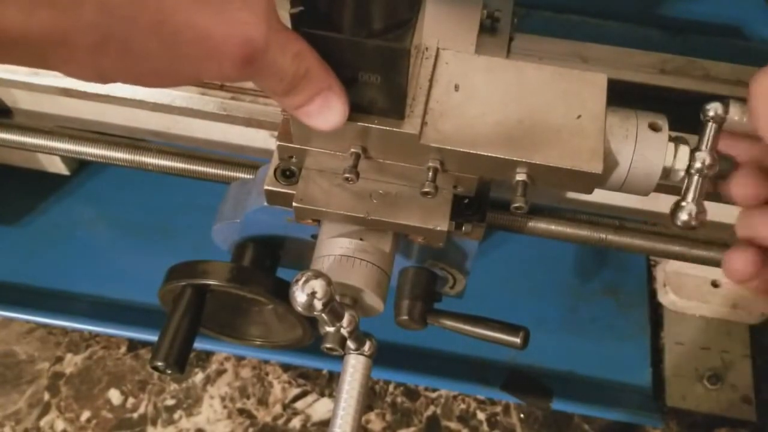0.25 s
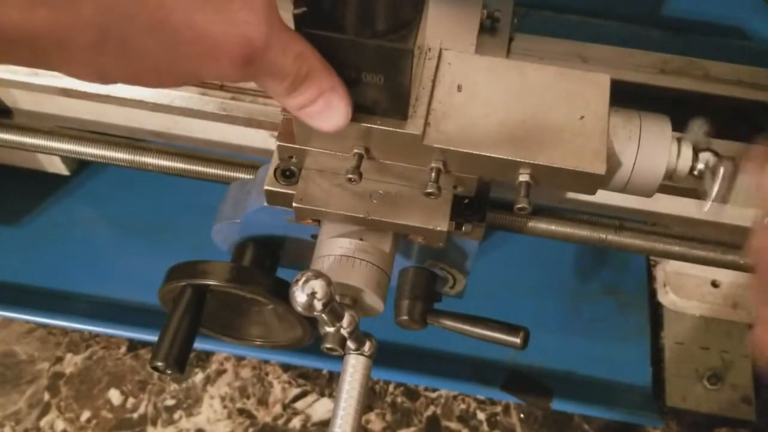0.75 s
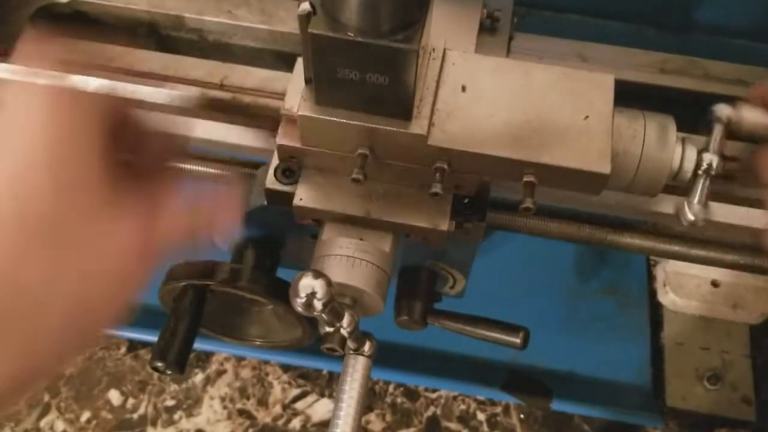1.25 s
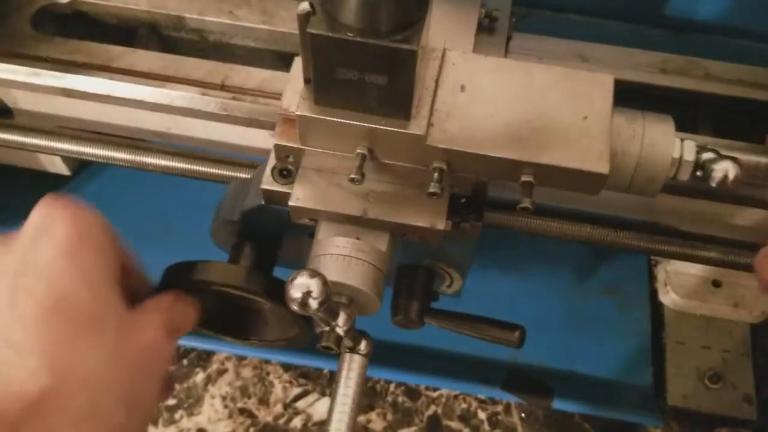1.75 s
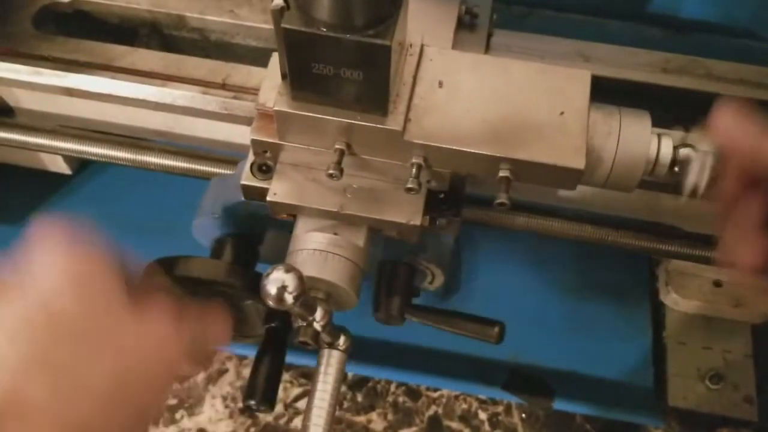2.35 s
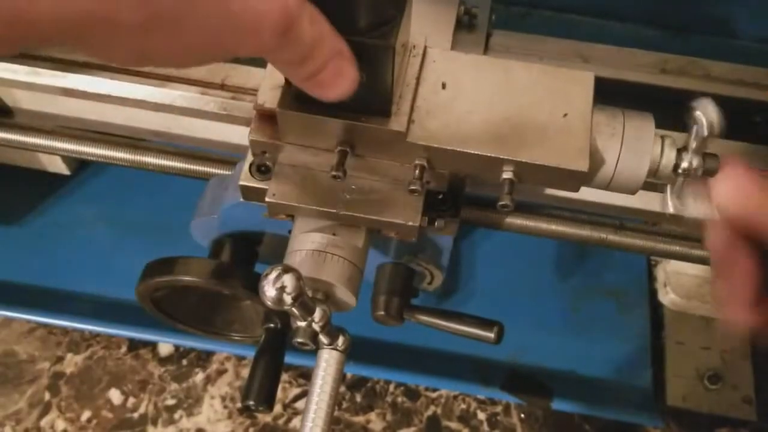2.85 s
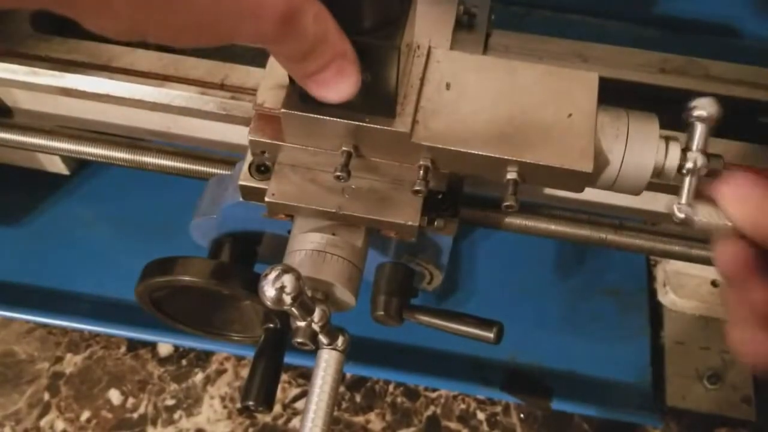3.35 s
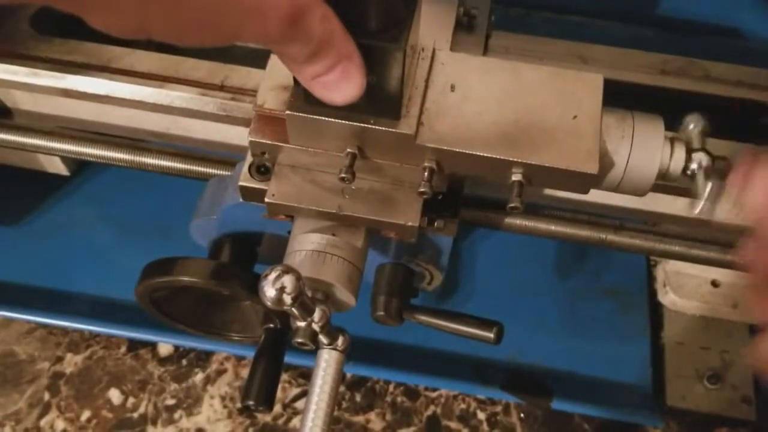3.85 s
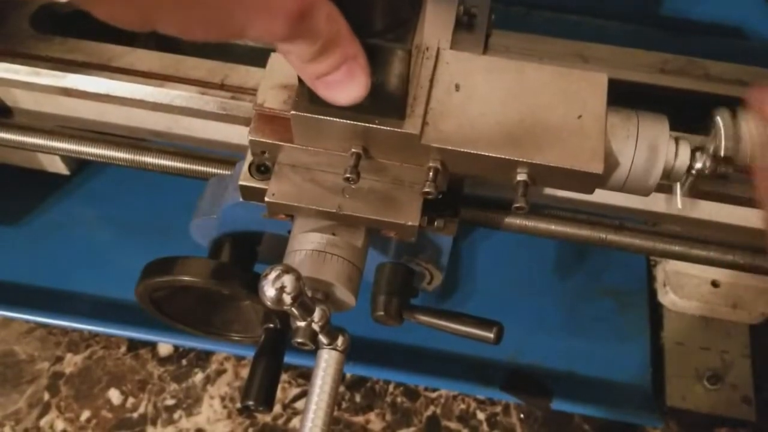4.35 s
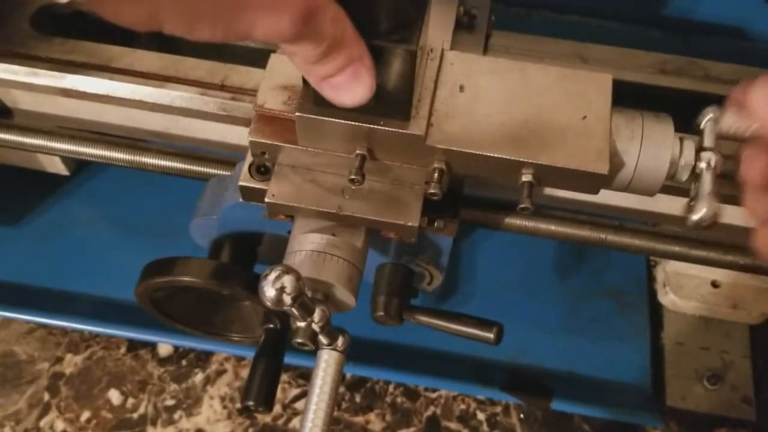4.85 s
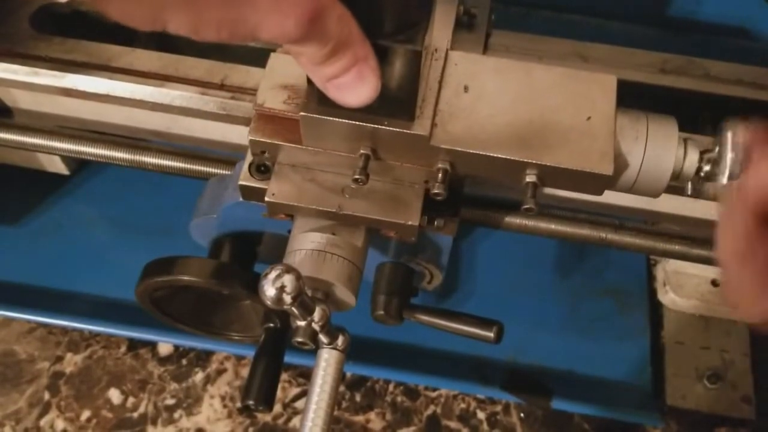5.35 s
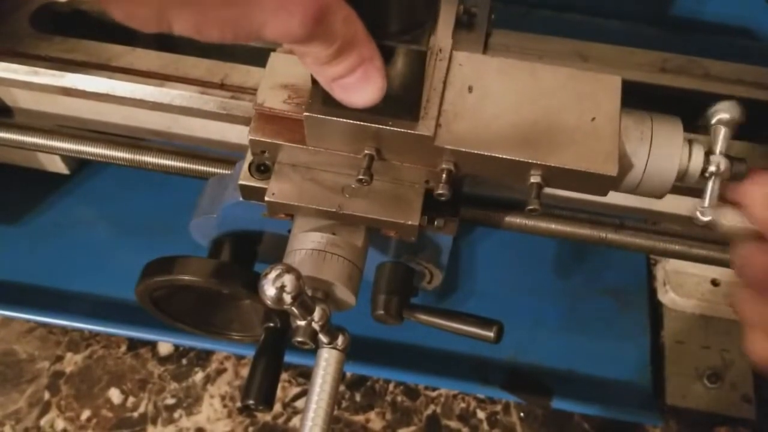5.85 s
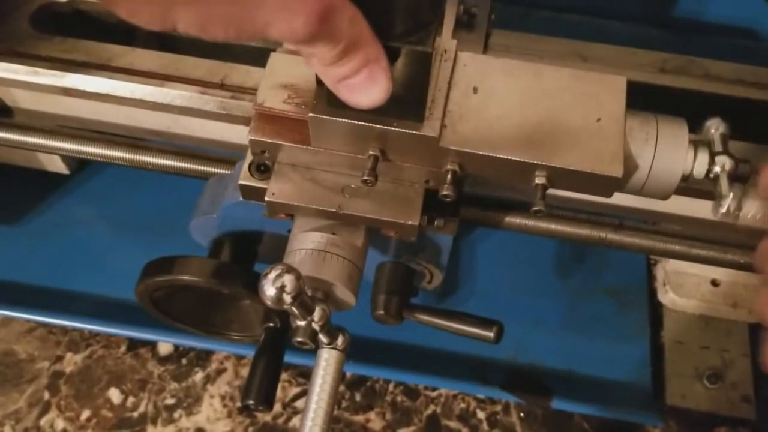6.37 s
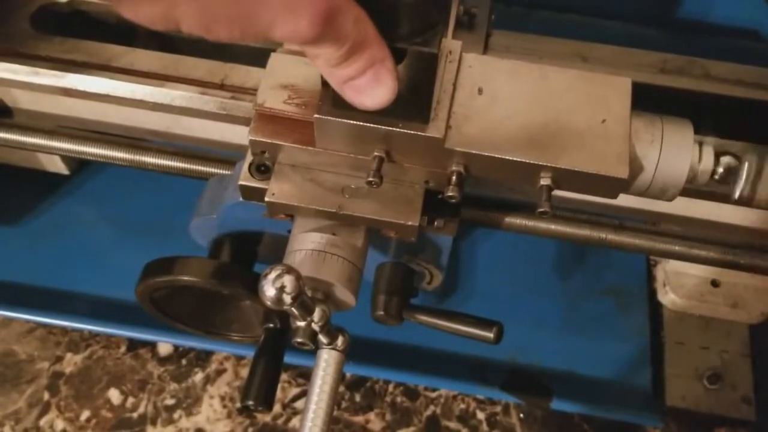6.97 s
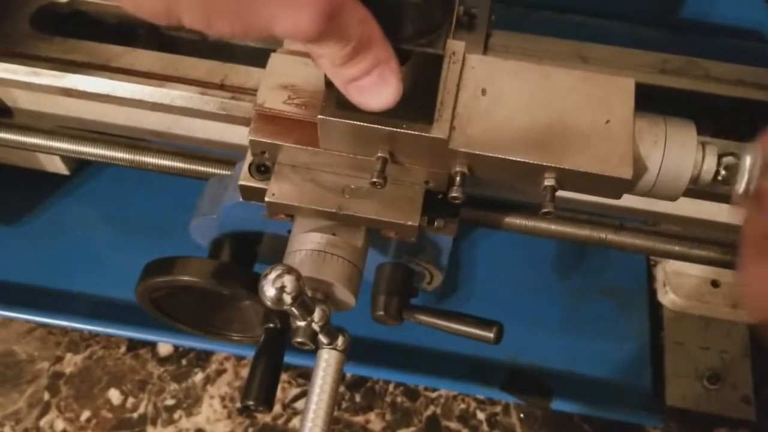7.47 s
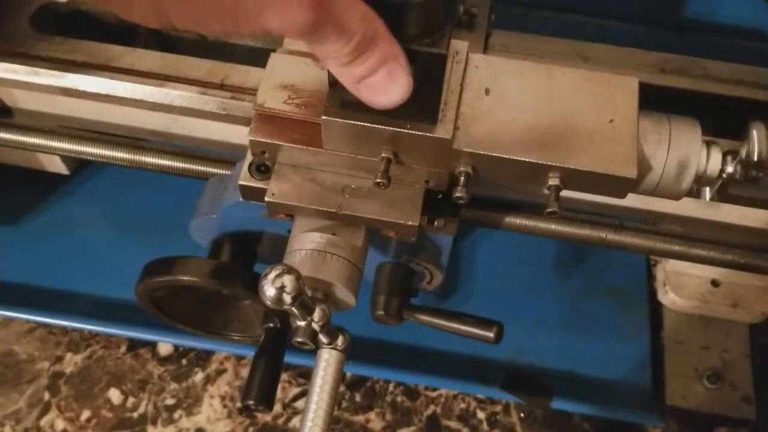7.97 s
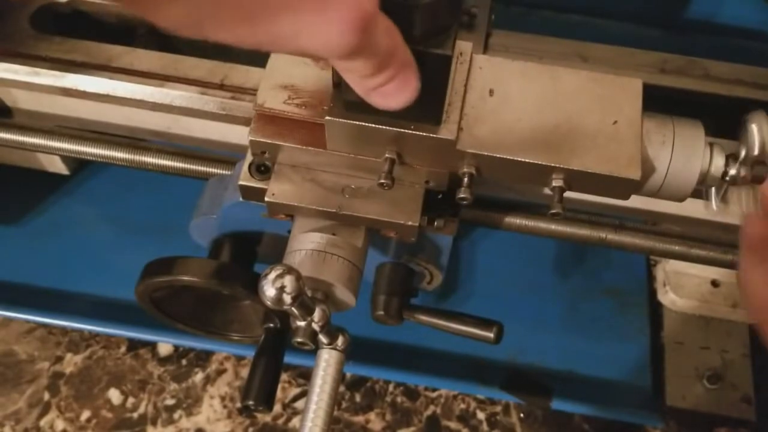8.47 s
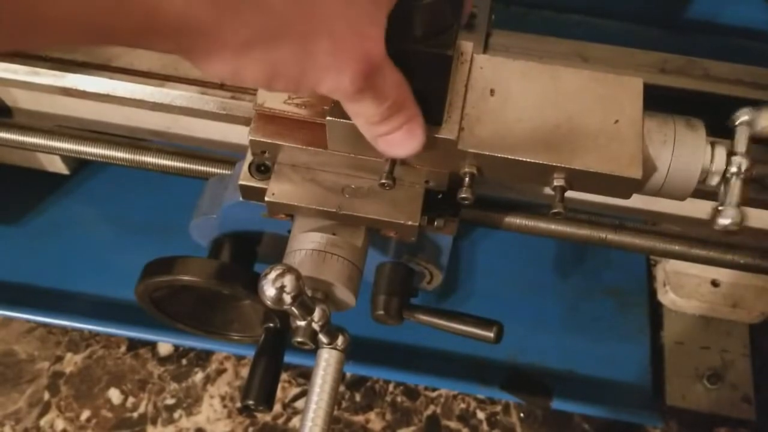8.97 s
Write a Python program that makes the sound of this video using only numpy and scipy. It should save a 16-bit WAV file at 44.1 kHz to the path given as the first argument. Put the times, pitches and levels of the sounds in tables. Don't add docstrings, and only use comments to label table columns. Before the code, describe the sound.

A small metal lathe slide is hand-cranked in steady turns, thumping softly on its bench with light ticks, rubbing scrapes and a brief gear rattle early on.

```python
import sys
import numpy as np
from scipy import signal
from scipy.fft import rfft, irfft, next_fast_len
from scipy.io import wavfile
from scipy.ndimage import map_coordinates

SR = 44100
rng = np.random.default_rng(int(sys.argv[2]) if len(sys.argv) > 2 else 0)


def unload_wav(signal):
    wavfile.write(
        sys.argv[1],
        SR,
        np.round(np.clip(np.atleast_2d(signal).T, -1, 1) * 32767).astype(np.int16),
    )


def voltage_ratio(decibels):
    exponent = np.asarray(decibels, float) / 20
    return 10 ** exponent


N = 406161


def unit(x):
    return x / np.sqrt(np.mean(x ** 2) + 1e-20)


def along(points, hz):
    f, v = np.transpose(points)
    return np.interp(np.log(hz + 1), np.log(f + 1), v)


def curves(rows):
    s, *cols = np.transpose(rows)
    return [np.interp(np.arange(N) / SR, s, c) for c in cols]


def within(rows):
    t = np.arange(N) / SR
    return np.clip(np.minimum(t - rows[0][0], rows[-1][0] - t) / 0.0026, 0, 1)


def wobble(rate):
    knots = rng.standard_normal(int(N * rate / SR) + 4)
    return map_coordinates(knots, [np.arange(0, N + 8, 8) * rate / SR]).repeat(8)[:N]


def filtered(x, response):
    m = next_fast_len(x.shape[-1] + min(8192, x.shape[-1] // 4))
    return irfft(rfft(x, m) * response(np.fft.rfftfreq(m, 1 / SR)), m)[..., :x.shape[-1]]


def resonances(peaks):
    def response(f):
        return sum((-1) ** k * voltage_ratio(db) * 1j * f * w / (c * c - f * f + 1j * f * w)
                   for k, (c, w, db) in enumerate(peaks))
    return response


def low_cut(hz, corner_hz):
    return hz ** 2 / (hz ** 2 + corner_hz ** 2)


def pair(response, alike):
    def mid_and_side(hz):
        turn = np.arccos(np.clip(along(alike, hz), -1, 1)) / 2
        return response(hz) * np.array([np.cos(turn), np.sin(turn)])
    mid, side = filtered(rng.standard_normal((2, N)), mid_and_side)
    return unit(np.array([mid + side, mid - side]))


def ring(modes, t, attack, loose=1):
    scatter_db, detune = 2 * loose, 0.008 * loose
    tones = 0
    for hz, db, t60 in modes:
        a, b = rng.standard_normal(2)
        decay = voltage_ratio(db + scatter_db * a - 60 * t / t60)
        tones = tones + decay * np.sin(2 * np.pi * hz * (1 + detune * b) * t)
    return tones * (1 - np.exp(-t / attack))


def contacts(events, modes, ring_db, crack_t60, tail_db, rise_s, note_t60, top_db):
    out, t = np.zeros((2, N + SR)), np.arange(SR // 10) / SR
    lead = 100
    burst = voltage_ratio(-60 * t / crack_t60) * (1 - np.exp(-t / rise_s))
    tail = voltage_ratio(tail_db - 60 * t / 0.069) * (1 - np.exp(-t / 0.0023))
    for s, db, dull_db, bright_db, note_hz in events:
        crack = rng.standard_normal((2, len(t))) * 1.005 + rng.standard_normal(len(t))
        chatter = voltage_ratio(4.56 * np.repeat(rng.standard_normal(len(t) // 45), 45))
        voices = modes + [(note_hz, 9.0 + 0.5 * dull_db, note_t60)]
        ringing = np.array([ring(voices, t, 0.00074 + rise_s) for _ in range(2)])
        blow = chatter * (crack * (burst + tail) + voltage_ratio(ring_db) * ringing)
        colour = [(300, dull_db + 7.5), (900, dull_db + 11.0), (2800, dull_db + 14.5),
                  (4000, -3.5), (7000, -10.5), (9000, bright_db), (11500, bright_db + 6.5),
                  (14000, bright_db + top_db), (15800, bright_db - 21)]
        blow = filtered(np.pad(blow, ((0, 0), (lead, 0))), lambda hz: voltage_ratio(along(colour, hz)))
        peak = np.abs(blow.mean(axis=0)).max()
        out[:, round(s * SR) - lead:][:, :len(t) + lead] += voltage_ratio(db + 0.5) * blow / peak
    return out[:, :N]


# frequency [Hz], level [dB per Hz].
AIR = [(15, -61), (25, -8), (64, -7.5), (123, -4), (223, -25.5), (463, -24), (607, -31.5), (1290, -32.5)]
# frequency [Hz], level [dB per Hz].
HISS = [(1560, -34), (2110, -34), (3080, -39.5), (8590, -41.5), (10700, -37), (13600, -40.5), (16000, -41)]
# frequency [Hz], likeness [0 to 1].
AIR_LIKENESS = [(30, 0.5), (120, 1), (300, 0.85), (600, 0.03), (12000, 0.08)]
# frequency [Hz], width [Hz], level [dB].
WHINE = (13280, 100, -87)


def air():
    hz, width, db = WHINE
    whine = voltage_ratio(db) * pair(resonances([(hz, width, 0)]), [(1000, 0.099)])
    hush = pair(lambda f: voltage_ratio(along(AIR + HISS, f)), AIR_LIKENESS)
    return voltage_ratio(-64.5 + 0.07 * wobble(2.7)) * hush + whine


# start [s], push [dB], pull [dB], rattle [dB], drag on the slide [dB].
TURNS = [(2.756, -46, -49.5, -17, 13.5), (3.019, -42.5, -44, -9.5, 6), (3.276, -40, -50.5, -13, 4),
         (3.542, -41, -40, 3.5, 9.5), (3.81, -43, -36, 0.5, 5), (4.076, -39.5, -39, 5.5, -1),
         (4.361, -41.5, -42.5, 3, 7), (4.65, -43.5, -35.5, 3.5, 2), (4.925, -46.5, -42, 3.5, -4),
         (5.207, -42.5, -57, -3, 2), (5.488, -38.5, -51.5, -5.5, -2), (5.769, -42, -46, 3.5, 5),
         (6.034, -40.5, -67, 0, 8.5), (6.323, -37.5, -47.5, -2.5, -2.5), (6.607, -39, -85, -11, 9.5),
         (6.849, -43.5, -60, 0, 13)]
# start [s], peak [dB], boards [dB], tray [dB].
GRIP_JOLTS = [(0.235, -45.5, -6, -30), (0.366, -58, -7, -34), (0.608, -53, -21, -42),
              (0.746, -56, -10, -36), (0.869, -61.5, 2, -25), (1.007, -55.5, -36, -49),
              (1.296, -43, -12.5, -33), (1.516, -50.5, -26, -41), (1.606, -40.5, -4, -32),
              (1.782, -53.5, -2, -12), (1.838, -62.5, 8.5, -6), (1.983, -52.5, -6, -19),
              (2.068, -54, 0.5, -16), (2.37, -37.5, -9, -36), (2.425, -44, -9, -34)]
# start [s], peak [dB], rattle [dB].
LATE_JOLTS = [(4.964, -39, -31), (6.147, -46, -3), (6.928, -35, -4.5), (7.188, -39.5, -8.5),
              (7.281, -47.5, 10), (7.658, -39, -16.5), (7.887, -51, -32), (7.966, -49, -3.5),
              (8.109, -53.5, -38), (8.246, -40.5, -47), (8.31, -44.5, -11), (8.522, -44.5, -31),
              (8.57, -45, -23), (8.764, -44.5, -6), (8.952, -56, 6), (9.069, -46.5, -1), (9.157, -47, -17)]


def lurches():
    pull_at, pull_rattle_db = 0.505, -7.5
    pushes = [(s, db, rattle_db) for s, db, _, rattle_db, _ in TURNS]
    pulls = []
    for (s, _, pull_db, rattle_db, _), following in zip(TURNS, TURNS[1:]):
        pulls.append((s + pull_at * (following[0] - s), pull_db, rattle_db + pull_rattle_db))
    return GRIP_JOLTS + [(s, db, -9 + 0.45 * rattle_db, -24.5 + rattle_db)
                         for s, db, rattle_db in pushes + pulls + LATE_JOLTS]


# frequency [Hz], level [dB], t60 [s].
BODY_MODES = [(121, 1, 0.21), (163.3, -4, 0.14), (94.3, -24, 0.24), (64.3, -19, 0.12)]
# frequency [Hz], level [dB], t60 [s].
BOARD_MODES = [(218, -2, 0.24), (290, -3, 0.18), (354, -2.5, 0.16)]
# frequency [Hz], level [dB], t60 [s].
TRAY_MODES = [(453.8, 1.5, 0.11), (438, -10.5, 0.13)]
# frequency [Hz], level [dB per Hz].
SCUFF = [(120, -10.5), (250, 5.5), (480, -3), (600, -14.5), (1200, -20.5), (2300, -41.5), (4000, -42)]
# time [s], effort [dB], load on the screw [dB], pinch of the gib [dB].
WORK = [(0.0, -64, -100, -97), (.3, -64, -85, -101), (.7, -55, -76, -78.5), (1.36, -75, -71.5, -79.5),
        (1.77, -47.5, -83, -76), (2.1, -60, -80, -79.5), (2.95, -60, -73.5, -76.5), (3.6, -56.5, -72, -81),
        (4.5, -56.5, -73, -79), (5.2, -54, -76, -76), (5.5, -54.5, -72, -78), (6.8, -55.5, -74, -73.5),
        (7.6, -67, -95.5, -88.5), (8.45, -50.5, -74.5, -78), (9.21, -59.5, -87, -81)]


def bench():
    out, t = np.zeros((2, N + SR)), np.arange(SR // 4) / SR
    held = voltage_ratio(24.6 * (1 - np.exp(-t / 0.069)))
    settle = 1 / (1 + (t / 0.11) ** 4)
    scuffs = pair(lambda hz: voltage_ratio(along(SCUFF, hz)), [(280, 0.63), (520, 0.48)])
    scuff_shape = voltage_ratio(-60 * t / 0.4) * (1 - np.exp(-t / 0.0015))
    scuff_level = np.zeros(N + SR)
    for s, db, boards_db, tray_db in lurches():
        body = voltage_ratio(-2.0) * ring(BODY_MODES, t, 0.0057)
        boards = voltage_ratio(boards_db - 10.0) * ring(BOARD_MODES, t, 0.031, loose=1.95)
        tray = np.array([ring(TRAY_MODES, t, 0.0088), ring(TRAY_MODES, t + 0.000087, 0.025)])
        tray *= voltage_ratio(tray_db + 14.0)
        start = round((s - 0.008) * SR)
        out[:, start:][:, :len(t)] += voltage_ratio(db) * held * settle * (body + boards + tray)
        scuff_level[start:][:len(t)] += voltage_ratio(db + boards_db - 6.5) * scuff_shape
    peaks = [(hz, 2.7 / t60 + 8, db + lift)
             for modes, lift in ((BODY_MODES, 0), (BOARD_MODES, -12), (TRAY_MODES, -14))
             for hz, db, t60 in modes]
    tremor = pair(resonances(peaks), [(120, 1.0), (280, 0.45), (450, 0.83)])
    tremor *= voltage_ratio(curves(WORK)[0] - 9.5 + 1.6 * wobble(12))
    return out[:, :N] + scuff_level[:N] * voltage_ratio(2.26 * wobble(70)) * scuffs + tremor


# middle [s], half length [s], nut lift [dB], gib lift [dB].
SWISHES = [(0.386, 0.064, 13, 13), (0.587, 0.064, 7.5, 3), (0.744, 0.041, 9.5, 12), (0.928, 0.05, 3.5, -4),
           (1.026, 0.041, 1.5, 5.5), (0.235, 0.023, 18, 27), (2.45, 0.09, 14, 13), (3.145, 0.037, 9, 12),
           (6.434, 0.035, -8, 16), (7.293, 0.17, 15, 8.5), (7.696, .05, 1, 7), (7.99, 0.037, 19.5, -12),
           (8.557, 0.013, 4.5, 12), (9.07, 0.025, 2, -9)]


def drags():
    t = np.arange(0, N + 8, 8) / SR
    bumps = [(s, half, nut_db, gib_db, 0) for s, half, nut_db, gib_db in SWISHES]
    bumps += [(s + 0.03, 0.04, db, 0.4 * db, 0.8 * db) for s, *_, db in TURNS]
    lift = sum(np.outer(lift_db, np.exp(-((t - s) / half) ** 4)) for s, half, *lift_db in bumps)
    return lift.repeat(8, axis=1)[:, :N]


# frequency [Hz], width [Hz], level [dB].
NUT = [(1292, 130, 2), (1090, 160, 0), (758, 91, 2)]
# frequency [Hz], width [Hz], level [dB].
GIB = [(2230, 420, 1), (1770, 270, 0.5), (4260, 3900, -18)]
# frequency [Hz], width [Hz], level [dB].
COLLAR = [(10760, 300, -5.5), (9700, 1800, -24)]
# time [s], hiss [dB].
DRY = [
    (0.0, -99),
    (.74, -81.5),
    (3.7, -81),
    (6.38, -78.5),
    (7.64, -99),
]
# time [s], pitch [Hz], level [dB].
SQUEAK = [
    (.59, 12300, -77),
    (.63, 12200, -74),
    (.665, 12100, -82),
    (.7, 13100, -82),
    (.73, 13500, -90),
]


def screw():
    nut_db, gib_db, collar_db = curves(WORK)[1:] + curves(DRY) + drags()

    def rub(peaks, corner_hz):
        catches = voltage_ratio(4.5 * wobble(28) + 3 * wobble(160) - 1.5)
        tone = resonances(peaks)
        return filtered(catches * rng.standard_normal((2, N)), lambda hz: tone(hz) * low_cut(hz, corner_hz))

    nut = voltage_ratio(nut_db - 5.5) * rub(NUT, 600)
    gib = voltage_ratio(gib_db - 8) * rub(GIB, 1400)
    collar_level = voltage_ratio(collar_db - 4.5 + 5 * wobble(30) + 2.5 * wobble(200))
    collar = collar_level * pair(resonances(COLLAR), [(1000, 0.4)])
    pitch_hz, squeak_db = curves(SQUEAK)
    phase = 2 * np.pi * np.cumsum(pitch_hz + 60 * wobble(300)) / SR
    squeak = voltage_ratio(squeak_db + 4.6 * wobble(63)) * within(SQUEAK) * np.sin(phase)
    return voltage_ratio(21.0) * (nut + gib) + collar + squeak


# start [s], peak [dB], bright share [dB].
TICKS = [(0.1913, -42, -4.5), (1.977, -39, -7), (2.264, -43.5, -5), (3.3392, -43, -9.5), (3.4052, -47, -8),
         (4.154, -42.5, -4), (4.5774, -44, 2), (5.007, -45.5, -9.5), (5.628, -41, 1), (5.9061, -43.5, -5),
         (6.1223, -38.5, -4), (6.1836, -31, 3.5), (6.3897, -38.5, -11.5), (6.4384, -44, -17),
         (6.4698, -42.5, -9.5), (6.82, -47.5, -17), (7.1085, -48, -5), (7.1486, -46.5, -20),
         (7.2133, -39, -5.5), (7.355, -50.5, -18), (7.4228, -53.5, -11), (7.674, -45.5, -18.5),
         (8.1088, -52.5, -10), (8.5218, -46.5, -17), (8.544, -48, -13), (9.131, -48.5, -20)]
# start [s], peak [dB], bright share [dB].
FLIPS = [(2.8207, -42.5, -8), (3.083, -52, -13), (3.604, -57.5, -18), (4.7191, -48, -9),
         (5.283, -48.5, -11), (5.555, -56, -31)]
# start [s], peak [dB], bright share [dB].
MORE_TICKS = [(1.5744, -59, -17), (1.9914, -50, -16), (2.027, -50.5, -17), (2.9672, -61, -4),
              (3.0112, -56, -9), (3.2839, -53, -2), (3.484, -56.5, -6), (3.8811, -57, -22),
              (5.8237, -59, -18), (6.8074, -54, -6), (7.08, -59, -15), (7.3043, -53.5, -10),
              (8.4203, -57, -18), (8.453, -60, -18), (8.502, -56, -23), (8.6662, -56.5, -20),
              (8.7355, -44.5, -8), (8.75, -47, -12)]
# frequency [Hz], level [dB], t60 [s].
SLIDE_MODES = [(4320, -8, 0.0082), (5900, -28, 0.018), (10840, -5, 0.018)]


def grip_ticks():
    ticks = [(s, db, -19.5, bright_db, 2307) for s, db, bright_db in TICKS + FLIPS + MORE_TICKS]
    return contacts(ticks, SLIDE_MODES, ring_db=9, crack_t60=0.0086, tail_db=-13,
                    rise_s=0.0011, note_t60=0.0069, top_db=0.5)


# start [s], peak [dB], dull share [dB], bright share [dB].
CLACKS = [(0.2102, -38.5, -19.5, -18), (0.222, -40.5, -13, -18), (0.365, -56, -19, -26),
          (0.588, -55, -12, -16), (0.755, -58, -8, -5), (0.8052, -55.5, -28, -6), (1.08, -52, -17, -16),
          (1.5883, -38, -10.5, -17), (2.5443, -41.5, -24.5, -11), (4.8564, -49.5, -22, -3.5),
          (6.414, -40.5, -21, -6), (6.5477, -53, -21, 0), (6.6872, -50, -20.5, -15),
          (8.1783, -56, -16, -16), (8.7143, -35, -19.5, -12), (8.8706, -46.5, -17.5, -6),
          (8.922, -43.5, -23.5, -7), (8.9393, -39.5, -24.5, -12.5), (9.1655, -48, -25.5, -18)]
# frequency [Hz], level [dB], t60 [s].
NUT_MODES = [(2240, 5, 0.01), (4930, -11, 0.0046), (8900, -2, 0.0087), (9940, 7, 0.019)]


def nut_clacks():
    return contacts([row + (1280,) for row in CLACKS], NUT_MODES, ring_db=-5.5, crack_t60=0.025,
                    tail_db=-23.5, rise_s=0.00091, note_t60=0.052, top_db=-5.5)


# start [s], peak [dB], gib share [dB], note [Hz].
SCRAPES = [(0.359, -57, -8, 1330), (0.41, -59, -15, 794), (0.579, -58.5, -1, 1400),
           (1.281, -44.5, -16, 1000), (1.509, -50, -3, 1000), (1.595, -47, -15, 1300),
           (1.685, -36.5, -13, 1230), (1.736, -46, 1, 1190), (1.829, -54, -4, 1260),
           (2.064, -53, -15, 1100), (2.261, -66, 5, 1250), (2.317, -48, -16, 1340), (2.408, -50, -9, 1050),
           (2.552, -58.5, -4, 1280), (2.748, -61, -22, 1250), (2.802, -55, -15, 1280),
           (3.123, -65, -7, 1500), (3.275, -60, -12, 1160), (3.537, -59, -19, 711), (3.802, -58, -22, 1100),
           (3.874, -59, -17, 1300), (3.938, -58, -17, 1280), (4.075, -60, -20, 958),
           (4.146, -58.5, -3, 1070), (4.212, -60, -13, 1480), (4.322, -58, -8, 1300),
           (4.376, -59, -21, 754), (4.718, -53, -7.5, 1250), (5.198, -58, -23, 800),
           (5.282, -53.5, -8, 1220), (5.492, -60, -20, 738), (5.737, -52, -15, 740),
           (6.015, -56, -19, 1240), (6.092, -57, -11, 1410), (6.313, -57, -24, 1350), (6.386, -57, 2, 1270),
           (6.588, -57, -22, 1350), (6.818, -52, -4, 1320), (7.152, -58, -5, 1280), (7.216, -60, -8, 1320),
           (7.644, -61, -2, 802), (7.707, -67, 3, 1260), (7.973, -52.5, -17, 751), (8.178, -69, -2, 1390),
           (8.509, -60, -0.5, 960), (8.647, -62, -11, 1260), (8.716, -46.5, -19, 1240),
           (8.872, -59, -12, 1350), (8.939, -58, -4, 1340), (9.062, -70, -11, 859)]


def scrapes():
    out, t = np.zeros((2, N + SR)), np.arange(SR // 8) / SR
    shape = voltage_ratio(-60 * t / 0.16) * (1 - np.exp(-t / 0.0036))
    for s, db, gib_db, note_hz in SCRAPES:
        noise = rng.standard_normal(len(t)) + 0.7 * rng.standard_normal((2, len(t)))
        grit = noise * voltage_ratio(3.3 * np.repeat(rng.standard_normal(len(t) // 104), 104))
        tone = resonances([(note_hz, 150, 0), (2200, 450, gib_db)])
        puff = filtered(shape * grit, lambda hz: tone(hz) * low_cut(hz, 500))
        out[:, round(s * SR):][:, :len(t)] += voltage_ratio(db + 7) * puff
    return out[:, :N]


# start [s], peak [dB], dull share [dB], bright share [dB], note [Hz].
KNOB_KNOCKS = [(1.2809, -52, 10, -16, 1270), (1.2911, -42.5, -13.5, -5, 1030),
               (2.3125, -33.5, -15, 2, 1280), (2.3173, -29.5, -25, -9, 2486), (2.328, -35, -11, -10, 2645),
               (2.3634, -38.5, 19, 1, 1080), (2.376, -30.5, -13.5, -6, 1005),
               (2.4067, -34.5, -8.5, -2.5, 1030), (2.414, -48, -7, -2, 1030),
               (2.4275, -44.5, -16, -3, 2080), (2.441, -56, -2, -15, 2090), (2.455, -61, -10, -13, 1850)]
# frequency [Hz], level [dB], t60 [s].
KNOB_MODES = [(1030, -7.5, 0.067), (1350, -3, 0.019), (2530, -3.5, 0.076), (4780, 0, 0.027),
              (4930, -7, 0.017), (7380, 5, 0.025), (10500, -7, .02), (12250, -1, 0.02),
              (12660, -0.5, 0.033), (13000, -6, 0.024)]


def knob_knocks():
    return contacts(KNOB_KNOCKS, KNOB_MODES, ring_db=-4.5, crack_t60=0.0078, tail_db=-16,
                    rise_s=0.001, note_t60=0.035, top_db=7.5)


# start [s], peak [dB], dull share [dB], bright share [dB], note [Hz].
CHIRPS = [(1.5063, -42.5, -13, -9.5, 1094), (3.1251, -43.5, 25, -22, 1860), (4.2129, -52, 2, -2, 1570),
          (6.763, -46.5, -4.5, 11.5, 1730), (6.923, -48, 10, -20, 1770), (7.6434, -42.5, -3, -30, 2030),
          (7.7075, -46, -13.5, -23, 2060), (7.8736, -54.5, -4, 6, 2040), (8.2268, -55.5, -7, -19, 1740),
          (8.3062, -52, 5, -21, 2050)]
# start [s], peak [dB], note [Hz].
CATCHES = [(7.7643, -63, 2060), (8.0745, -63, 2110), (8.0925, -63, 2090), (8.2496, -65, 2190),
           (8.3938, -67, 1750), (8.5594, -49.5, 2180), (8.5744, -65, 2250)]


def slide_chirps():
    chirps = CHIRPS + [(s, db, 5, -25, hz) for s, db, hz in CATCHES]
    return contacts(chirps, [], ring_db=-2.5, crack_t60=0.015, tail_db=-22,
                    rise_s=0.001, note_t60=0.016, top_db=-3)


# time [s], rattle [dB].
RUN = [
    (1.672, -62),
    (1.69, -45.5),
    (1.715, -43.5),
    (1.745, -47),
    (1.79, -46),
    (1.815, -45),
    (1.845, -49),
    (1.88, -60),
    (1.93, -76),
]
# frequency [Hz], level [dB], t60 [s].
RACK_MODES = [(1270, 10.5, 0.0061), (1810, -2, 0.058), (2820, 2.5, 0.033), (4300, 1, 0.015),
              (5070, -0.5, 0.035), (7880, 2, 0.04), (10800, 4.5, 0.035), (11480, -6, 0.021),
              (14170, -10, .03)]


def rack():
    grains = 0.7 * rng.standard_normal((2, N)) + rng.standard_normal(N)
    grains = grains * voltage_ratio(4 * wobble(250) + wobble(60))
    apron = RACK_MODES + [(438, 19.0, 0.18), (817, 9, 0.035), (1660, -3, 0.00033)]
    peaks = [(hz, 0.77 / t60 + 40, db) for hz, db, t60 in apron]
    return voltage_ratio(curves(RUN)[0] - 7.5) * within(RUN) * unit(filtered(grains, resonances(peaks)))


# start [s], peak [dB], dull share [dB], bright share [dB], note [Hz].
WHEEL_KNOCKS = [(1.679, -43, 0, -30, 1310), (1.6852, -34, -26, -12.5, 1330), (1.693, -37, -20, -9, 1970),
                (1.703, -40, 2, -15, 1970), (1.71, -46, -6, -20, 1470), (1.735, -43, -14, -20, 1300),
                (1.7447, -37, -11, -10, 2820), (1.758, -51, -14, -8, 2820),
                (1.7648, -30, -18.5, -8.5, 1780), (1.7766, -35, -7, -16, 2820),
                (1.8008, -39, -10, -9, 2820), (1.819, -37, -4, -15, 2820), (1.827, -28, -17, -6.5, 1270),
                (1.838, -56, -3, -18, 1270), (1.864, -47, -32, -12, 1150), (1.9024, -53, -26, -13, 2880)]


def wheel_knocks():
    return contacts(WHEEL_KNOCKS, RACK_MODES, ring_db=-6, crack_t60=0.024, tail_db=-23,
                    rise_s=0.0019, note_t60=0.013, top_db=5.0)


# frequency [Hz], tilt [dB].
LEAN = [(200, 0), (700, -1), (1300, 1), (2800, 5), (5600, 6), (10000, -2), (13000, 2)]


def ports(x):
    side, lag_s = np.array([[1], [-1]]), 6 / 44100
    return filtered(x, lambda hz: voltage_ratio(side * along(LEAN, hz) / 2) * np.exp(-1j * np.pi * hz * lag_s * side))


# frequency [Hz], t60 [s].
SHOP = [(300, 0.4), (2000, 0.25), (12000, 0.11)]


def shop(x):
    hz, t, z = signal.stft(rng.standard_normal((2, SR // 2)), SR, nperseg=256)
    tail = signal.istft(z * voltage_ratio(-60 * t / along(SHOP, hz)[:, None]), SR, nperseg=256)[1]
    late = np.pad(x, ((0, 0), (200, 0)))
    return signal.fftconvolve(late, tail / np.linalg.norm(tail[0]), axes=1)[:, :N]


def scene():
    bed = air() + bench() + screw() + scrapes() + ports(rack())
    metal = ports(grip_ticks() + nut_clacks() + knob_knocks() + slide_chirps() + wheel_knocks())
    return bed + metal + voltage_ratio(-9.5) * shop(metal)


def roll_off(x):
    return signal.sosfilt(signal.butter(12, 16510, fs=SR, output="sos"), x)


def record(dry):
    top_hz, shelf = 15850, 0.09
    band = filtered(dry, lambda hz: np.where(hz < top_hz, 1, shelf * (hz < 1.04 * top_hz)))
    return roll_off(band)


dry = scene()
out = record(dry)
unload_wav(out)
```